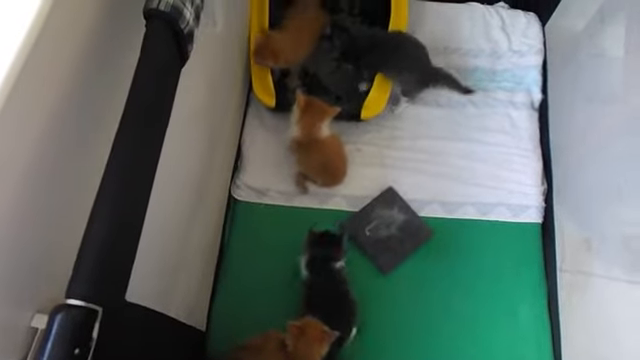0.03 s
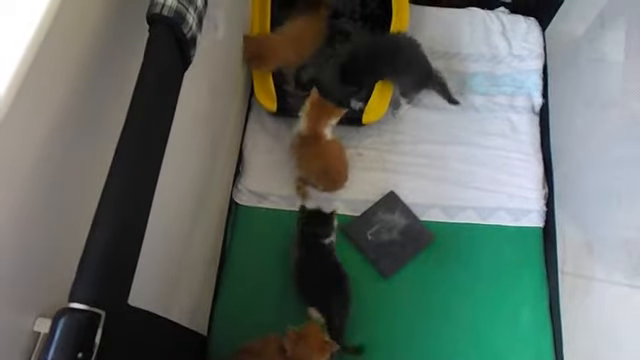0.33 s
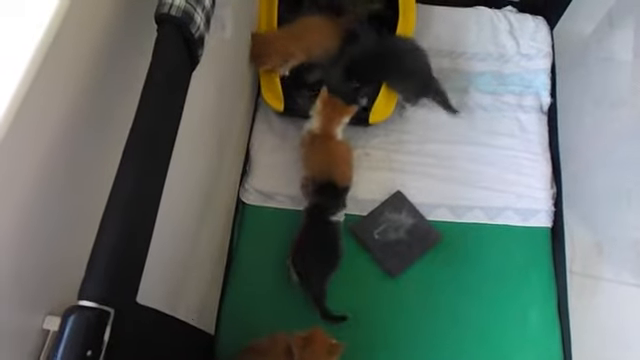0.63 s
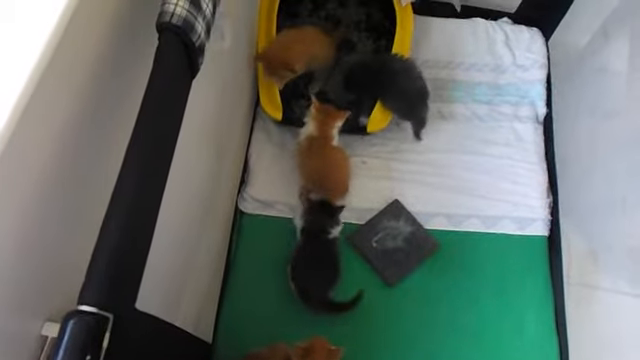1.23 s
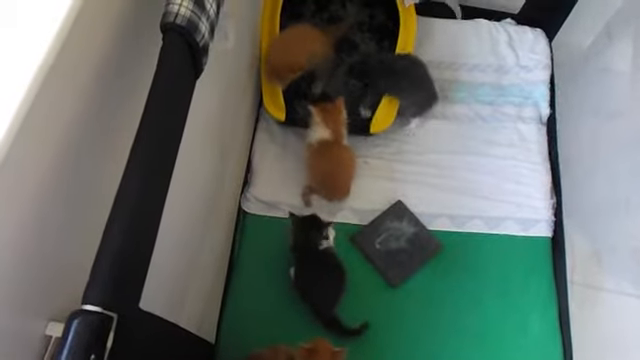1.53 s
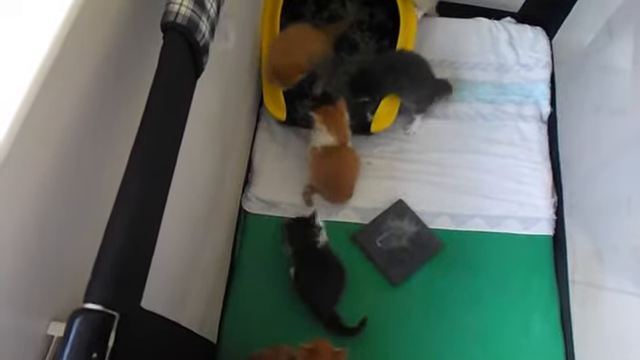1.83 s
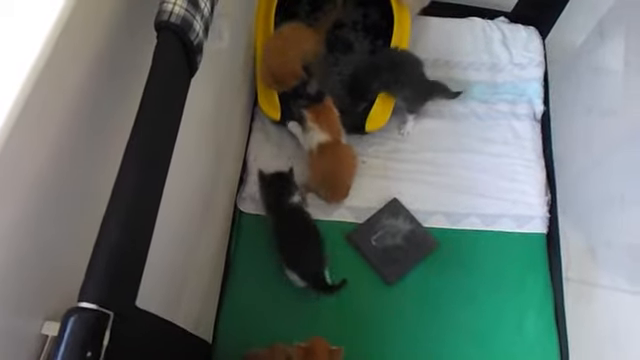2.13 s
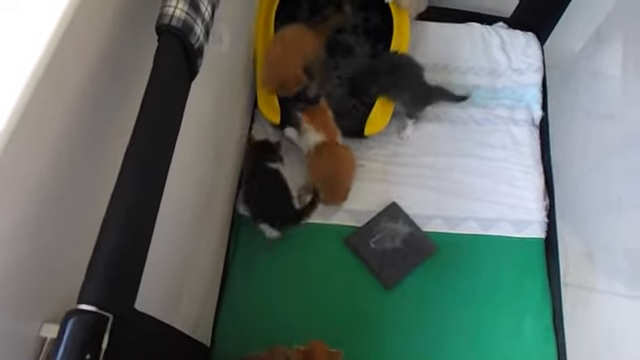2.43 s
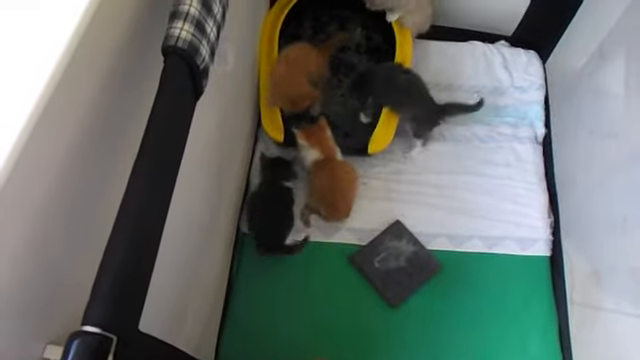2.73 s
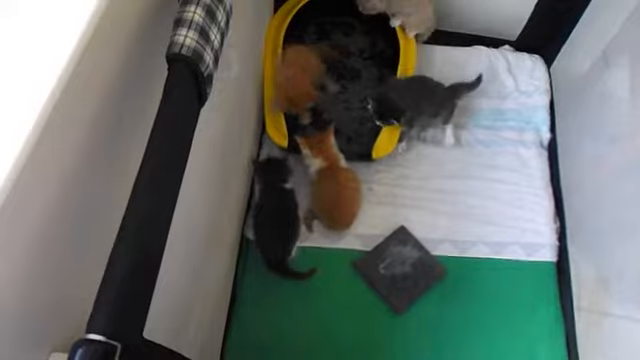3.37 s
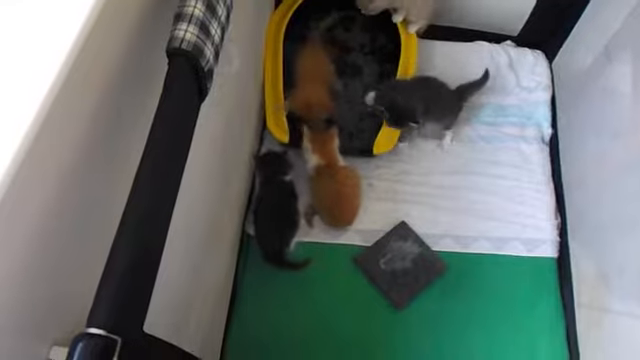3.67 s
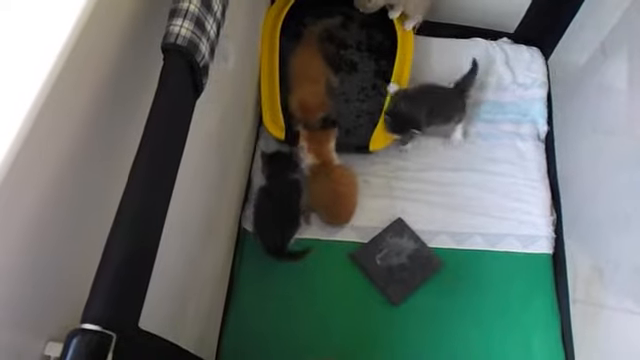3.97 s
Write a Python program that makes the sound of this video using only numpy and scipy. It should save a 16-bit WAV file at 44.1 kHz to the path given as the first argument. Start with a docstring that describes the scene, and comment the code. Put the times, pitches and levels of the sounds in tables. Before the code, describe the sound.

Kittens rustle and scuff in a plastic litter tray, with soft thumps and knocks.

```python
"""Kittens in and around a plastic litter tray, heard on one microphone in a small, hard-walled room.
Room hiss, a slow sway of air at the microphone and a thin electrical whine lie under it throughout.
From the start paws rustle through litter and bedding and their soft pads thump the tray; soon claws
and flicked pellets tick on the plastic. The tray rocks and knocks at about 1.6 s, faintly at 2 s,
and again around 3.4 s and 3.6 s, each knock ringing briefly in the room."""
import sys
import numpy as np
from scipy import signal
from scipy.fft import rfft, irfft
from scipy.io import wavfile
from scipy.ndimage import uniform_filter1d

SR = 44100
rng = np.random.default_rng(int(sys.argv[2]) if len(sys.argv) > 2 else 0)


def bounce(signal):
    """Save signal as a 16-bit WAV file at the path given by the first command-line argument."""
    frames = np.transpose(np.atleast_2d(signal))
    limited = np.clip(frames, -1, 1)
    pcm = np.round(limited * 32767).astype(np.int16)
    wavfile.write(sys.argv[1], SR, pcm)


N = 176400


def undb(db):
    """Decibels to amplitude."""
    return 10 ** (np.asarray(db) / 20)


def unit(x):
    """Scale to rms 1."""
    return x / np.sqrt(np.mean(x ** 2))


def colour(x, spectrum):
    """Filter by (frequency [Hz], level [dB]) points; the causal response has unit energy."""
    hz, db = np.array(spectrum).T
    size = 2 * N
    bin_hz = np.maximum(np.arange(N + 1) * SR / size, 1e-3)
    gain = unit(undb(np.interp(np.log(bin_hz), np.log(hz), db)))
    cepstrum = irfft(np.log(gain))
    cepstrum[1:N] *= 2  # minimum phase: nothing rings ahead of a blow
    cepstrum[N + 1:] = 0
    return irfft(rfft(x, size) * np.exp(rfft(cepstrum)))[:len(x)]


def noise(spectrum):
    """Steady coloured noise of rms 1."""
    return unit(colour(rng.standard_normal(2 * N), spectrum)[N:])


def fade(t, t60):
    """Fall by 60 dB in t60 seconds."""
    return np.exp(-np.log(1000) * t / t60)


def drift(rate_hz):
    """Smooth random drift of rms 1."""
    hold = int(SR / rate_hz)
    steps = np.repeat(rng.standard_normal(N // hold + 1), hold)
    return unit(uniform_filter1d(uniform_filter1d(steps, hold), hold)[:N])


def add(out, start, x):
    """Mix x in at a time in seconds."""
    i = max(int(start * SR), 0)
    out[i:i + len(x)] += x[:N - i]


def room_hiss():
    """The steady air of the room, strongest in the bass."""
    # room tone (frequency [Hz], level [dB])
    spectrum = [(20, -1.5), (32, 5.5), (50, -4), (62, 0), (85, -12.5), (115, -16.5), (170, -15), (350, -21),
                (520, -26), (900, -27.5), (1500, -31), (3500, -33.5), (6000, -37), (9000, -40),
                (12500, -42), (16000, -46.5)]
    return undb(-46) * noise(spectrum)


def air_sway():
    """Air sways slowly at the microphone, mostly below hearing."""
    # colour of the moving air (frequency [Hz], level [dB])
    spectrum = [(1, -7.5), (3, -2), (5, 7), (7.5, 11.5), (11, -27.5), (16, -0.5), (22, -33), (35, -50.5),
                (70, -87), (300, -120)]
    # its rise and fall (time [s], level [dB])
    swell = [(0, -32), (.35, -24.5), (.85, -33), (1.25, -31.5), (1.7, -28.5), (2.2, -37.5), (2.6, -40),
             (3.2, -29.5), (4, -39.5)]
    t = np.arange(N) / SR
    level = undb(np.interp(t, *np.array(swell).T))
    fade_in = np.minimum(t / 0.01, 1)
    return level * fade_in * noise(spectrum)


def electrical_whine(centre_hz=10690.4, spacing_hz=80.7, waver_db=1.5):
    """A high electrical tone with wavering sidebands and a narrow skirt of hiss."""
    # centre tone and sidebands (offset [spacings], level [dB])
    lines = [(-2, -78), (-1, -61), (0, -59.5), (1, -69), (2, -77), (3, -83), (5, -79), (6, -81), (7, -84),
             (8, -85), (9, -85)]
    t, tones = np.arange(N) / SR, np.zeros(N)
    for step, db in lines:
        peak = np.sqrt(2) * undb(db + waver_db * drift(rate_hz=60))
        hz = centre_hz + step * spacing_hz
        tones += peak * np.sin(2 * np.pi * (hz * t + rng.random()))
    white = rng.standard_normal(N) + 1j * rng.standard_normal(N)
    flutter = signal.sosfilt(signal.butter(4, 300, fs=SR, output="sos"), white)
    skirt = (flutter * np.exp(2j * np.pi * centre_hz * t)).real  # 300 Hz either side of the tone
    return tones + undb(-64) * unit(skirt)


def grains(per_second=700, spread_db=2.5):
    """A dense stream of tiny slips, a few much larger than the rest."""
    size = undb(spread_db * np.minimum(rng.exponential(size=N), 4))
    slips = rng.random(N) < per_second / SR
    return unit(slips * size * np.sign(rng.standard_normal(N)))


def paw_rustle(attack_s=0.014, release_s=0.017):
    """Paws drag grit, rasp the tray's wall and scuff its floor; faint fidgeting goes on between."""
    # strokes through litter and bedding (time [s], length [s], grit [dB], rasp [dB], scuff [dB])
    strokes = [(0.163, .09, -65, -54, -62), (0.269, 0.15, -50.5, -53.5, -41.5),
               (0.561, 0.07, -59, -50, -43.5), (0.664, 0.046, -50.5, -49, -54),
               (0.932, 0.086, -56.5, -53.5, -48.5), (1.147, 0.061, -53.5, -51, -45),
               (1.278, 0.23, -65.5, -60.5, -58), (1.552, 0.037, -51.5, -49, -46.5),
               (1.633, 0.079, -47.5, -57, -47), (1.777, .08, -64, -73, -57),
               (2.052, 0.066, -57, -50, -52.5), (2.158, 0.023, -54.5, -50, -56),
               (2.284, 0.053, -64, -53, -63), (2.417, 0.077, -49.5, -50.5, -57),
               (2.56, 0.1, -53.5, -59, -61), (2.642, 0.069, -52.5, -53, -66),
               (2.939, 0.029, -54.5, -53, -55.5), (3.047, 0.017, -81, -54, -54),
               (3.141, 0.089, -64, -59.5, -50.5), (3.256, 0.15, -57.5, -55, -49.5),
               (3.37, 0.069, -58, -49.5, -46), (3.555, 0.082, -54.5, -49, -58),
               (3.683, 0.02, -63, -59, -66)]
    # bright dragged litter (frequency [Hz], level [dB])
    grit = [(400, -34), (1000, -4), (1700, -0.5), (2400, -0.5), (3400, 0.5), (4500, -0.5), (5600, -6),
            (7500, -17.5), (11000, -13.5), (16000, -49)]
    # rasp on the wall (frequency [Hz], level [dB])
    rasp = [(300, -12.5), (520, -4.5), (630, 3), (740, -2), (880, 0), (1030, -6), (1170, -4), (1400, -11),
            (1800, -10), (2600, -14.5), (10000, -57)]
    # dull scuff on the floor (frequency [Hz], level [dB])
    scuff = [(70, -16.5), (140, -7.5), (240, -2.5), (300, -7), (370, -2), (440, -6.5), (520, -15.5),
             (900, -21), (2200, -38.5), (10000, -68)]
    t, out = np.arange(N) / SR, np.zeros(N)
    start, length, *levels = np.array(strokes).T[:, :, None]
    press = np.clip((t - start) / attack_s, 0, 1)
    lift = np.exp(-np.maximum(t - start - length, 0) / release_s)
    swing_db = 1.5 * drift(rate_hz=30)
    for spectrum, stroke_db, fidget_db in zip((grit, rasp, scuff), levels, (-68, -63.5, -63)):
        stroke_power = np.sum((press * lift * undb(stroke_db)) ** 2, axis=0)
        fidget_power = undb(fidget_db + swing_db) ** 2
        out += colour(grains() * np.sqrt(stroke_power + fidget_power), spectrum)
    return out


def paw_thumps():
    """A soft pad pushes on the tray; a longer contact rings only the low modes."""
    # paw falls (time [s], relative level [dB], contact [s])
    falls = [(0.114, -25.5, 0.0039), (.266, 0, 0.0019), (.278, 0, 0.002), (.335, -2, 0.0014),
             (0.375, -27, 0.0014), (0.677, -14.5, 0.0015), (1.047, -4, 0.0017), (1.062, -4.5, 0.0026),
             (1.205, -13, 0.0039), (1.585, -15.5, 0.00081), (2.476, -17.5, 0.0016), (2.528, -8, 0.0033),
             (2.567, -14.5, 0.0038), (2.952, -20.5, 0.0049), (3.603, -13.5, 0.0023)]
    # modes of the tray (frequency [Hz], level [dB], t60 [s])
    modes = [(142.6, -21.5, 0.19), (190, -9.5, 0.11), (233.2, -4.5, 0.1), (283, -6.5, 0.12),
             (304.4, -5, 0.07), (356.6, -4.5, 0.18), (377.6, -2, 0.12), (420, -3.5, 0.071),
             (551.5, -12.5, 0.13), (610, -11, 0.11), (727, -12.5, 0.077)]
    t, out = np.arange(SR) / SR, np.zeros(N)
    for start, db, contact_s in falls:
        detune, place = rng.standard_normal((2, len(modes)))  # each paw rings the modes differently
        ring = np.zeros(SR)
        for k, (hz, mode_db, t60) in enumerate(modes):
            gain = (-1) ** k * undb(mode_db + 0.82 * place[k])
            pitch_hz = hz * (1 + 0.0039 * detune[k])
            ring += gain * np.sin(2 * np.pi * pitch_hz * t) * fade(t, t60)
        push = np.sin(np.pi * np.minimum(t / contact_s, 1)) ** 2
        thump = unit(signal.fftconvolve(ring, push)[:SR])
        add(out, start, thump * undb(db - 44.5))
    return out


def blows(hits, spectrum, t60, attack_s=0.0014):
    """Each hit (time [s], level [dB]) sets off a dense cluster of quickly damped vibrations."""
    t, out = np.arange(SR) / SR, np.zeros(N)
    envelope = np.minimum(t / attack_s, 1) * fade(t, t60)
    for start, db in hits:
        add(out, start, unit(rng.standard_normal(SR) * envelope) * undb(db))
    return colour(out, spectrum)


def claw_ticks():
    """Claws and flicked pellets tap the plastic."""
    # taps (time [s], relative level [dB])
    taps = [(.456, -10), (.560, -7), (.583, 1), (.992, -12), (1.204, -9.5), (1.245, -8), (1.624, -2.5),
            (2.073, -15), (2.411, -7), (2.434, -9), (2.492, -12), (2.889, -16.5), (2.961, -15),
            (3.147, -15), (3.281, -11.5), (3.572, -7.5)]
    # tapped plastic (frequency [Hz], level [dB])
    spectrum = [(300, 4), (1200, -2), (1900, -2.5), (2600, 3.5), (3800, 5.5), (4800, -2), (5800, -6.5),
                (7500, -10), (8600, -16.5), (16000, -62)]
    return undb(-56) * blows(taps, spectrum, t60=0.04)


def tray_knocks():
    """The tray rocks: a boom of its floor, a hollow note of its walls and a crack at the rim."""
    # knocks, each part on its own relative scale (time [s], boom [dB], hollow [dB], crack [dB])
    knocks = [(1.571, -34, -12, -27), (1.584, -15.5, -0.5, -4), (1.618, -30, -1.5, -4),
              (1.638, -38, -9, -35), (2.041, -23, -12, -32), (3.362, -1.5, -3.5, 0.5),
              (3.385, -2, -5, -3.5), (3.401, -13.5, -20, -1), (3.594, -8.5, -10, -10)]
    # boom of the floor (frequency [Hz], level [dB])
    floor = [(35, -39), (60, -5), (100, -7.5), (150, 0.5), (200, -2.5), (300, -19), (400, -4.5), (520, -22),
             (900, -57), (4000, -77)]
    # hollow note of the walls (frequency [Hz], level [dB])
    walls = [(200, -28), (420, -2.5), (620, 1), (900, 1.5), (1150, -13), (1450, -22.5), (1900, -8),
             (2600, -36), (6000, -52), (12000, -73)]
    # crack of the rim (frequency [Hz], level [dB])
    rim = [(300, -11.5), (1150, -1), (1450, -3), (2100, -7), (2700, -5), (3400, -4), (4500, -8.5),
           (5400, -12), (6400, -36), (11000, -23), (16000, -48)]
    start, boom_db, hollow_db, crack_db = np.array(knocks).T
    boom = blows(zip(start, boom_db - 44.5), floor, t60=0.11)
    hollow = blows(zip(start, hollow_db - 51.5), walls, t60=0.06)
    crack = blows(zip(start, crack_db - 54.5), rim, t60=0.069)
    return boom + hollow + crack


def small_room(direct, tail_db=-2, build_s=0.0026, crossover_hz=1500):
    """The microphone hears direct sound, a diffuse tail and ringing notes of the room and the tray."""
    # ringing notes of the room and the plastic tray (frequency [Hz], gain [dB])
    notes = [(144, -7), (236, -7.5), (354, 0.5), (377, 6.5), (640, -7), (715, -12), (893, -9), (1152, 1),
             (2146, -20)]
    t = np.arange(SR) / SR
    wash = rng.standard_normal(SR)
    low = signal.sosfilt(signal.butter(2, crossover_hz, fs=SR, output="sos"), wash)
    high = signal.sosfilt(signal.butter(2, crossover_hz, "high", fs=SR, output="sos"), wash)
    tail = low * fade(t, t60=0.57) - high * fade(t, t60=0.53)  # the treble dies a little sooner
    tail *= np.minimum(t / build_s, 1)
    diffuse = undb(tail_db) * unit(tail) / np.sqrt(SR)
    decay = fade(t, t60=0.58)
    tones = sum(undb(db) * np.cos(2 * np.pi * hz * t) for hz, db in notes)
    ringing = tones * 2 * decay / decay.sum()
    lingering = signal.fftconvolve(direct, diffuse + ringing)[:N]
    return (direct + lingering) / np.hypot(1, undb(tail_db))


def scene():
    """The kittens' noises ring in the room; hiss, sway and whine join them at the one microphone."""
    kittens = paw_thumps() + tray_knocks() + claw_ticks() + paw_rustle()
    return (small_room(kittens) + room_hiss() + air_sway() + electrical_whine())[None]


def record(dry, top_hz=15750):
    """The recorder cuts the highest treble steeply."""
    return signal.sosfilt(signal.ellip(10, .2, 70, top_hz, fs=SR, output="sos"), dry)


dry = scene()
out = record(dry)
bounce(out)
```